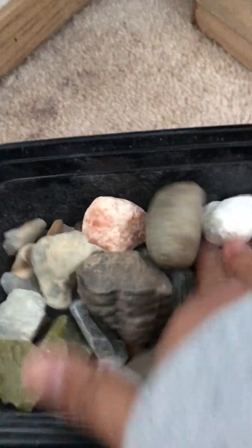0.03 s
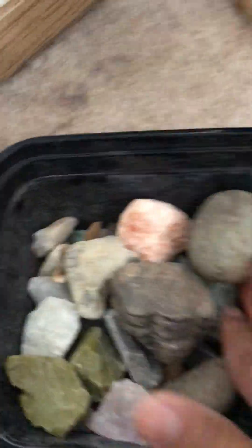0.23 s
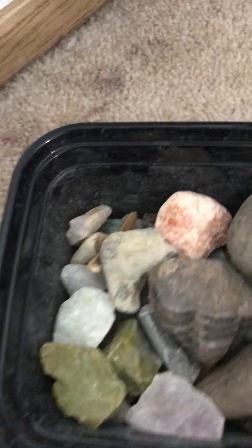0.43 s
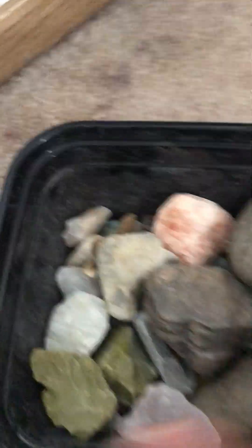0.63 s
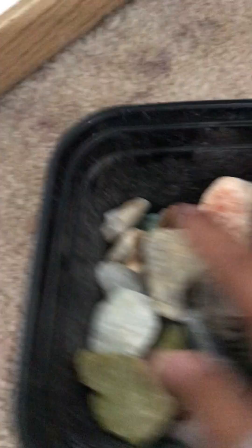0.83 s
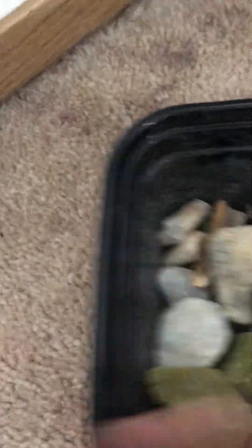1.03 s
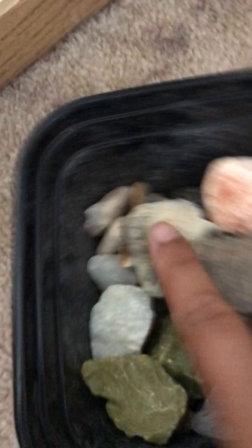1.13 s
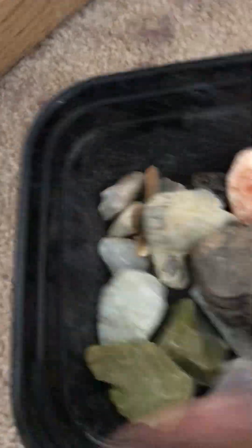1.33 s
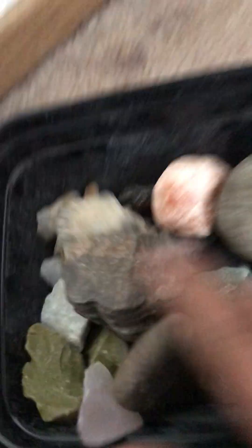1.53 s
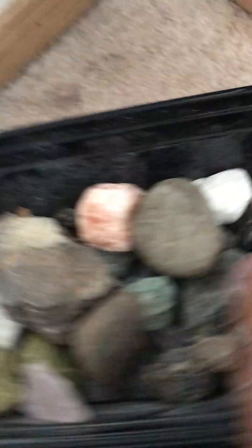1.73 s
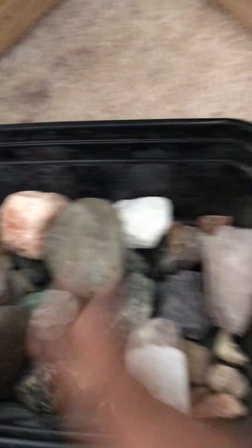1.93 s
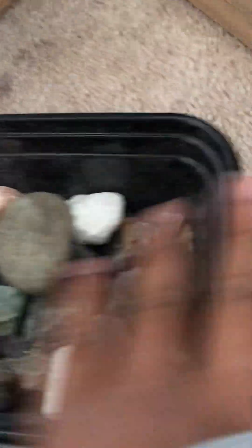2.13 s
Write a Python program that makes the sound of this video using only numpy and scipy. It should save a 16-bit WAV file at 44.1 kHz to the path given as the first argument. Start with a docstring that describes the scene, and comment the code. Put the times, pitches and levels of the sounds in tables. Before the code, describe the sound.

Stones knock and scrape against each other and a plastic tray, close to the microphone in a small, quiet room. After an opening rattle and a few lighter taps, the clatter thickens over faint hand rubbing, then dies down.

```python
"""Small rocks knock, snap and chatter as a hand pushes them about in a thin plastic tray on a carpet.
Each contact rings the tray and the stones: a clack from their bodies, a tick from their edges.
Sliding rocks catch and slip, which grinds; heavier ones thud on the tray floor, small ones tap.
A soft rubbing hiss goes with the movement. All is close by, in a small, quiet room."""
import sys
import numpy as np
from scipy import signal
from scipy.fft import rfft, irfft
from scipy.io import wavfile
from scipy.ndimage import uniform_filter1d

SR = 44100
rng = np.random.default_rng(int(sys.argv[2]) if len(sys.argv) > 2 else 0)


def bounce(signal):
    """Save signal as a 16-bit WAV file at the path given by the first command-line argument."""
    frames = np.transpose(np.atleast_2d(signal))
    limited = np.clip(frames, -1, 1)
    pcm = np.round(limited * 32767).astype(np.int16)
    wavfile.write(sys.argv[1], SR, pcm)


N = 97020

# Modes of the loaded tray. Each row: pitch in Hz, relative level in dB, T60 in seconds.
TRAY_MODES = [(414, -9.5, 0.021), (646, -16, 0.057), (854, 0.5, 0.0068), (1031, 1, 0.019), (1194, 4, 0.016),
              (1380, 2, 0.017), (1596, 0.5, 0.012)]
GRIT_PER_S, CHATTER_SPREAD_DB, CUTOFF_HZ = 3000, 2.5, 15900


def knocks():
    """A first contact, then chatter that settles, sooner for a brief knock; each rock favours some modes."""
    # Each row: start and time before settling in seconds, then tray, clack and tick levels in dB.
    hits = [(0.1014,0.0012,-22,-22.5,-55), (0.1203,0.011,-31,-17,-35), (0.129,0.014,-11.5,-14.5,-18.5),
            (0.214,0.0026,-23.5,-27.5,-36), (0.422,0.003,-25.5,-30.5,-34.5), (0.458,0.00089,-19.5,-30,-33),
            (0.4611,0.0043,-24,-28.5,-36), (0.5451,0.0055,-26,-33.5,-42), (0.777,0.009,-24.5,-34.5,-71),
            (0.796,0.0045,-32,-30.5,-74), (1.013,0.003,-27.5,-30.5,-33.5),
            (1.1086,0.0029,-19.5,-24.5,-23.5), (1.1247,0.01,-15,-14.5,-22),
            (1.156,0.0084,-21.5,-28.5,-25.5), (1.297,0.0097,-22,-21,-26), (1.311,0.01,-14.5,-18,-18),
            (1.353,0.0056,-45,-20.5,-26.5), (1.452,0.01,-17.5,-21.5,-29), (1.471,0.0082,-17,-25,-29.5),
            (1.526,0.0057,-17,-21.5,-27.5), (1.6484,0.0083,-21,-22.5,-31), (1.681,0.0035,-25,-40,-21),
            (1.698,0.011,-21,-24.5,-22.5), (1.76,0.0055,-23,-19.5,-20.5), (1.8334,0.0052,-25,-19.5,-25.5),
            (1.851,0.0021,-23,-26,-33), (2.1405,0.0048,-27,-30,-44), (2.173,0.0051,-27.5,-33,-37.5)]
    max_settle_s, rock_spread_db = 0.0055, 2.2
    out, t = np.zeros(N), np.arange(SR // 10) / SR
    for start_s, hold_s, *levels_db in hits:
        settling = np.exp(-np.maximum(t - hold_s, 0) / min(max_settle_s, hold_s))
        clicks = 0.58 * contacts(len(t), per_s=1600, spread_db=CHATTER_SPREAD_DB) * settling
        clicks[0] = 1
        for modes, level_db in zip(bodies(), levels_db):
            favoured = [(hz, db + rock_spread_db * rng.standard_normal(), t60) for hz, db, t60 in modes]
            add(out, start_s, from_db(level_db) * unit_blow(strike(clicks, favoured)))
    return out


def snaps():
    """One stone slips off an edge and hits another hard, with the briefest skid."""
    # Each row: start in seconds, clack level in dB.
    hits = [(0.326,-44), (1.102,-21), (1.206,-29.5), (1.407,-22.5), (1.4193,-29), (1.446,-21), (1.4661,-24),
            (1.596,-24.5), (1.607,-30), (1.812,-35.5), (1.887,-28), (1.9,-29), (2.091,-51)]
    skid_s, tray_db, tick_db = 0.0008, -5, -2.5
    out, t = np.zeros(N), np.arange(SR // 10) / SR
    for start_s, clack_db in hits:
        clicks = contacts(len(t), GRIT_PER_S, CHATTER_SPREAD_DB) * (t < skid_s)
        clicks[0] = 1
        for modes, offset_db in zip(bodies(), (tray_db, 0, tick_db)):
            add(out, start_s, from_db(clack_db + offset_db) * unit_blow(strike(clicks, shifted(modes))))
    return out


def grinding():
    """Rough faces catch and slip: catches rattle the tray, the hardest its floor; grit rings the stones."""
    # Each row: time in seconds, tray level in dB, grit level in dB.
    slide_levels = [(0,-52,-52.5), (0.06,-35,-40.5), (0.14,-18,-19), (0.21,-35,-40), (0.28,-52.5,-63),
                    (0.38,-36,-40), (0.43,-29.5,-34), (0.515,-60.5,-72), (0.57,-48.5,-53), (0.72,-56.5,-57),
                    (0.79,-30.5,-44), (0.89,-41.5,-40), (0.96,-28.5,-31), (1.22,-27,-30), (1.33,-19,-22.5),
                    (1.38,-29.5,-33.5), (1.435,-23.5,-28.5), (1.48,-21,-23), (1.63,-31,-37), (1.72,-21,-20),
                    (1.79,-38,-42), (1.865,-23,-23.5), (1.94,-38.5,-36), (2.035,-38,-38.5), (2.09,-67,-80),
                    (2.15,-42.5,-42)]
    # Each row: pitch in Hz, relative level in dB, T60 in seconds.
    floor_modes = [(173, 2.5, 0.024), (255, 6, 0.053), (328, -0.5, 0.063)]
    tray_db, grit_db = curves(slide_levels)
    tray, clack, tick = bodies()
    catches, grit = grains(per_s=320), grains(GRIT_PER_S)
    layers = [(catches + grit / 2, tray, tray_db),
              (catches ** 2, floor_modes, tray_db - 18.5),
              (catches + grit, clack, grit_db),
              (catches + grit, tick, grit_db - 8.5)]
    return sum(from_db(db) * unit_rms(sliding(clicks, modes)) for clicks, modes, db in layers)


def thuds():
    """A heavy rock drops on the tray floor; the pitch depends on where it lands."""
    # Each row: start in seconds, pitch in Hz, level in dB.
    drops = [(0.459, 457, -31.5), (0.549, 442, -41), (0.874, 387, -40.5), (1.015, 237, -37.5),
             (1.131, 337, -28.5), (1.311, 336, -31.5), (1.472, 300, -25.5), (1.705, 144, -37.5)]
    out, click = np.zeros(N), signal.unit_impulse(SR // 5)
    for start_s, hz, db in drops:
        floor = radiate(ring(click, hz, t60_s=0.038), hz, hz)
        add(out, start_s, from_db(db) * unit_blow(floor))
    return out


def taps():
    """One small stone touches down: a brief ring, and a fainter answer from the tray."""
    # Each row: start in seconds, pitch in Hz, stone level in dB.
    touches = [(0.407, 1310, -29), (0.73, 1115, -42), (0.797, 2130, -28.5), (0.8705, 3620, -38.5),
               (0.895, 1070, -33.5)]
    out, click = np.zeros(N), signal.unit_impulse(SR // 10)
    for start_s, hz, db in touches:
        stone = unit_blow(radiate(ring(click, hz, t60_s=0.015), hz, hz))
        tray = from_db(-4) * unit_blow(strike(click, TRAY_MODES))
        add(out, start_s, from_db(db) * (stone + tray))
    return out


def rubbing():
    """Smooth hiss of hand and sleeve on the move."""
    # Each row: time in seconds, level in dB.
    rub_levels = [(.53, -73), (.6, -51.5), (.86, -53), (.96, -43.5), (2.03, -48.5), (2.08, -80)]
    # Each row: frequency in Hz, relative density in dB.
    rub_spectrum = [(300, -9), (1300, -26), (6000, -11.5), (16000, -11)]
    return from_db(curves(rub_levels)[0]) * noise(rub_spectrum)


def reflections(x, t60_s=0.066, delay_s=0.003, lowpass_hz=2870, gain_db=-15):
    """Short, dull reverberation of a carpeted room."""
    t = np.arange(SR // 3) / SR
    tail = rng.standard_normal(len(t)) * from_db(-60 * t / t60_s) * (t > delay_s)
    tail /= np.linalg.norm(tail)
    tail = signal.sosfilt(signal.butter(1, lowpass_hz, fs=SR, output="sos"), tail)
    return from_db(gain_db) * signal.fftconvolve(x, tail)[:N]


def room_tone():
    """Faint, steady low noise of the room."""
    # Each row: frequency in Hz, relative density in dB.
    room_spectrum = [(20, -33), (65, 12.5), (400, 3.5), (12000, -36)]
    return from_db(-58.5) * noise(room_spectrum)


def bodies(clack_from_hz=1890, tick_from_hz=5680, stone_t60_s=0.0072):
    """Modes of the tray, the stones' clack and their edges' tick; stone modes are evenly spaced in pitch."""
    # Stone against stone. Each row: frequency in Hz, relative level in dB.
    stone_spectrum = [(1800, 3.5), (3900, 2.5), (4900, -2), (8500, -6), (10300, -9.5), (15000, -7.5)]
    clack_hz = np.geomspace(clack_from_hz, tick_from_hz, 14, endpoint=False)
    tick_hz = np.geomspace(tick_from_hz, CUTOFF_HZ, 18, endpoint=False)
    clack = [(hz, db_at(stone_spectrum, hz), stone_t60_s) for hz in clack_hz]
    tick = [(hz, db_at(stone_spectrum, hz), stone_t60_s) for hz in tick_hz]
    return TRAY_MODES, clack, tick


def contacts(samples, per_s, spread_db):
    """Contacts at random moments, most small and a few large."""
    heights = from_db(spread_db * np.minimum(rng.exponential(1, samples), 4))
    return heights * (rng.random(samples) < per_s / SR)


def grains(per_s, window_s=0.048):
    """Random contacts evened out by a steady push, rms 1."""
    clicks = contacts(N, per_s, spread_db=2)
    power = np.abs(uniform_filter1d(clicks ** 2, int(window_s * SR)))
    return clicks / np.sqrt(power + 1e-6)


def sliding(clicks, modes, stretch_s=0.06):
    """Contacts ring a body whose modes shift from one stretch of the slide to the next."""
    out, step = np.zeros(N), int(stretch_s * SR)
    for i in range(0, N, step):
        stretch = np.pad(clicks[i:i + step], (0, step))
        add(out, i / SR, strike(stretch, shifted(modes)))
    return out


def shifted(modes, spread=0.05):
    """Modes a little off pitch, as other rocks touch in other places."""
    return [(hz * np.exp(spread * rng.standard_normal()), db, t60_s) for hz, db, t60_s in modes]


def strike(clicks, modes, share_spread_db=1):
    """The body takes an uneven share of each contact; each mode gets a random strength and sign."""
    out = np.zeros(len(clicks))
    force = clicks * from_db(share_spread_db * rng.uniform(-1, 1, len(clicks)))
    for hz, db, t60_s in modes:
        drive = force * rng.uniform(-1, 1, len(clicks))
        out += from_db(db) * ring(drive, hz, t60_s)
    return radiate(out, modes[0][0], modes[-1][0])


def ring(clicks, hz, t60_s):
    """A resonance that gives each click the same energy whatever its decay."""
    radius, angle = from_db(-60 / (t60_s * SR)), 2 * np.pi * min(hz, 0.45 * SR) / SR
    feedback = [1, -2 * radius * np.cos(angle), radius ** 2]
    return np.sqrt(1 - radius) * signal.lfilter([1, 0, -1], feedback, clicks + 1e-18)


def radiate(x, lowest_hz, highest_hz):
    """A body radiates little far below its lowest or above its highest mode."""
    band_hz = [lowest_hz / 3, min(highest_hz * 1.4, 0.45 * SR)]
    return signal.sosfilt(signal.butter(2, band_hz, "band", fs=SR, output="sos"), x)


def noise(spectrum):
    """Coloured noise, rms 1."""
    gains = from_db(db_at(spectrum, np.arange(N // 2 + 1) * SR / N))
    return unit_rms(irfft(rfft(rng.standard_normal(N)) * gains, N))


def db_at(spectrum, hz):
    """Read a spectrum on a log-frequency axis."""
    points_hz, points_db = np.transpose(spectrum)
    return np.interp(np.log(np.maximum(hz, 1)), np.log(points_hz), points_db)


def curves(rows):
    """Timed columns, interpolated to every sample."""
    times_s, *columns = np.transpose(rows)
    return [np.interp(np.arange(N) / SR, times_s, column) for column in columns]


def from_db(db):
    """Decibels to gain."""
    return 10 ** (np.asarray(db) / 20)


def unit_rms(x):
    """Scale to rms 1."""
    return x / np.sqrt(np.mean(x ** 2) + 1e-20)


def unit_blow(x):
    """Scale to the energy of 10 ms at rms 1."""
    return x / np.sqrt(np.sum(x ** 2) / (SR / 100) + 1e-20)


def add(out, start_s, x):
    """Mix x into out from start_s."""
    i = int(start_s * SR)
    out[i:i + len(x)] += x[:N - i]


def scene():
    """Rocks and tray in the room, with rubbing and room tone; mono."""
    rocks = knocks() + snaps() + taps() + grinding() + thuds()
    return (rocks + reflections(rocks) + rubbing() + room_tone())[None]


def record(dry):
    """Round the loudest peaks, then cut the top treble."""
    ceiling = 0.8
    rounded = ceiling * np.tanh(dry / ceiling)
    return signal.sosfilt(signal.cheby1(14, 0.2, CUTOFF_HZ, fs=SR, output="sos"), rounded)


dry = scene()
out = record(dry)
bounce(out)
```